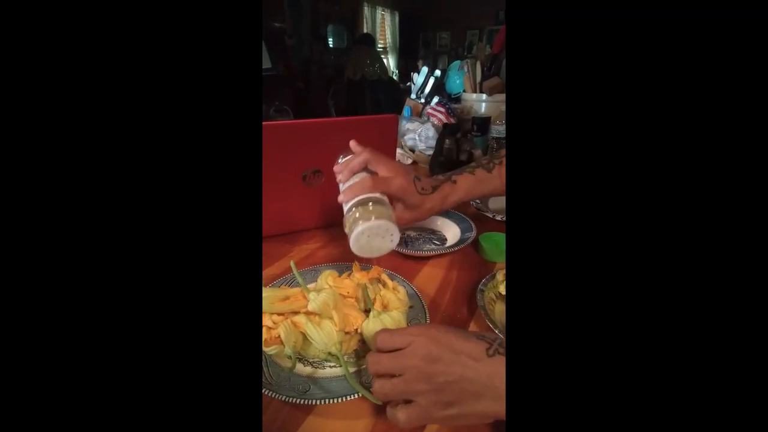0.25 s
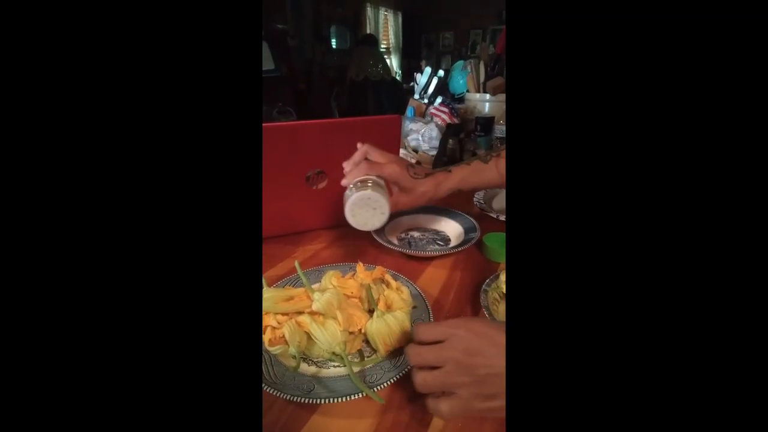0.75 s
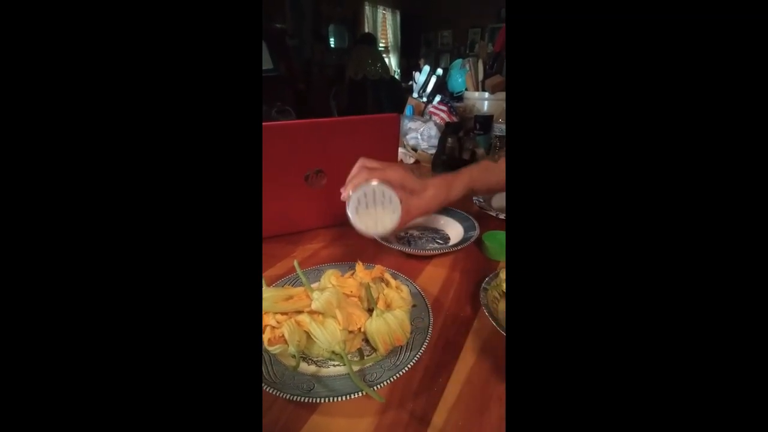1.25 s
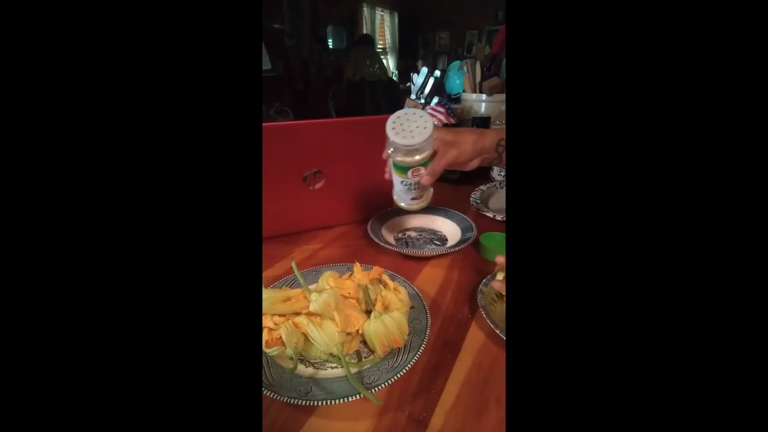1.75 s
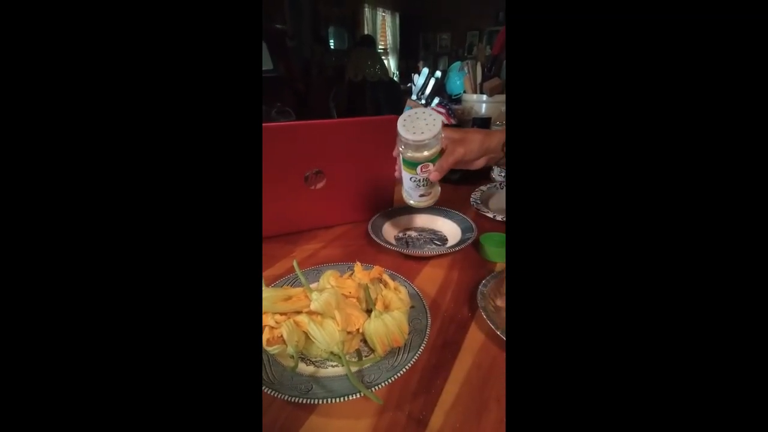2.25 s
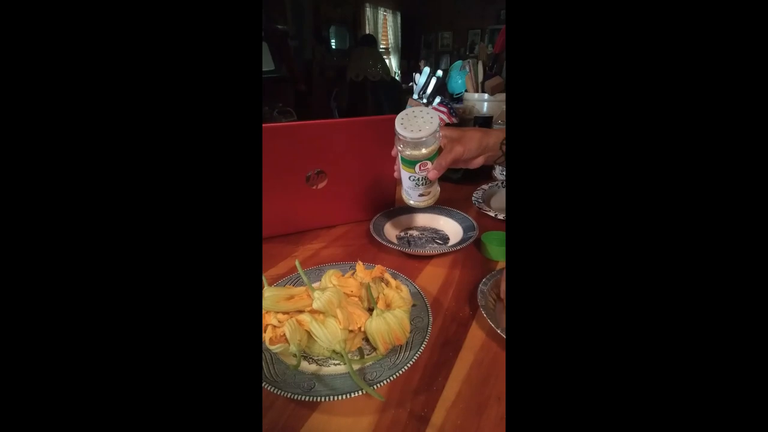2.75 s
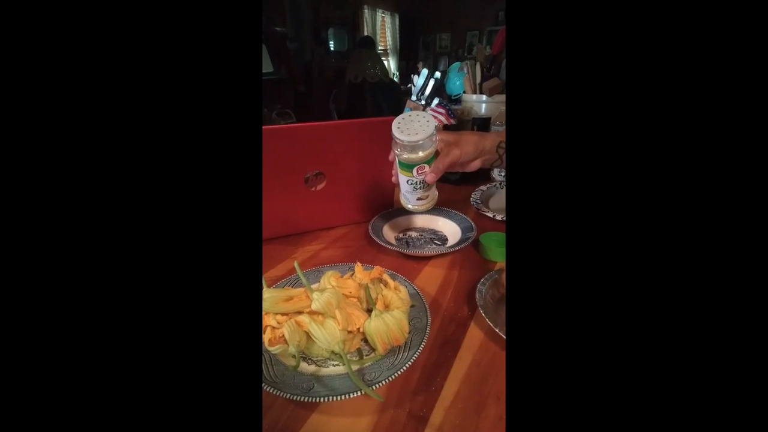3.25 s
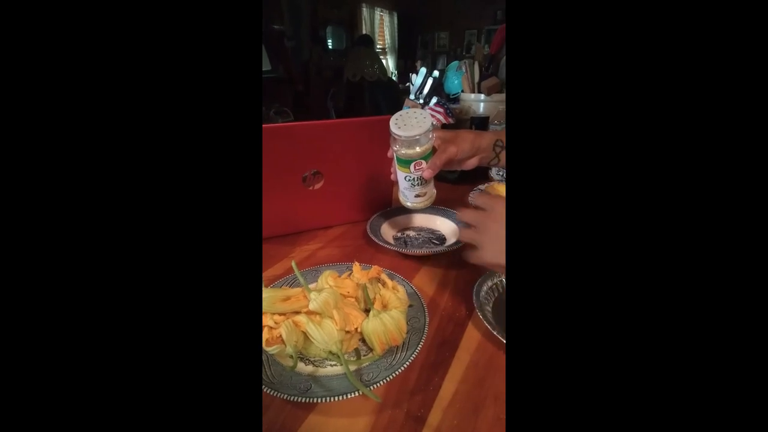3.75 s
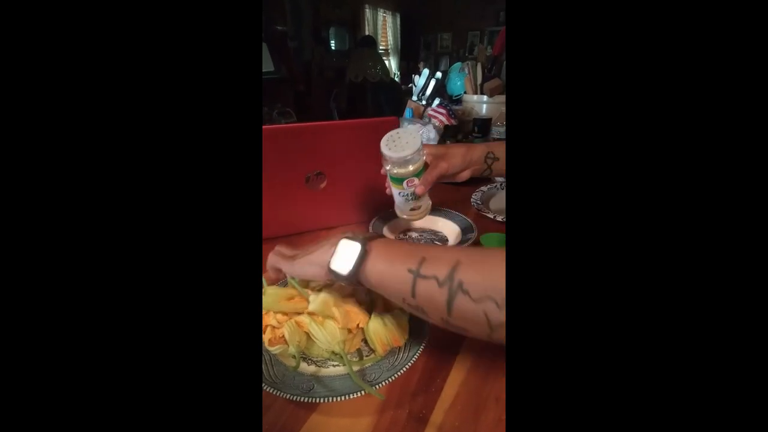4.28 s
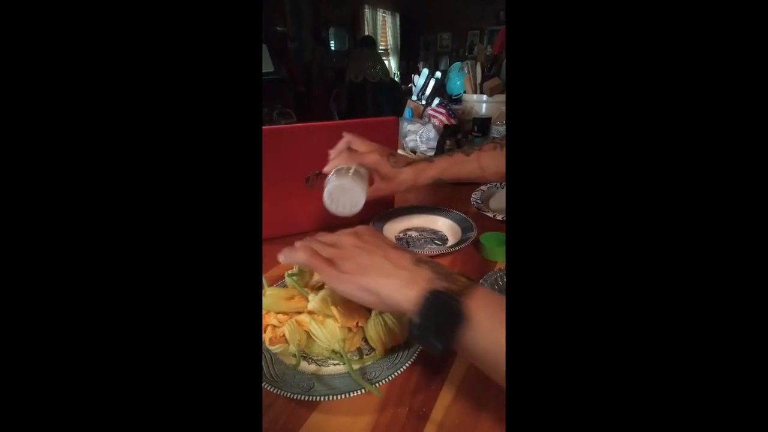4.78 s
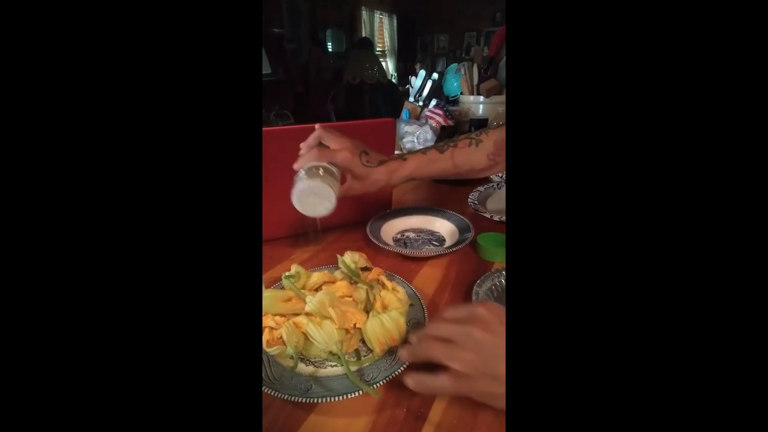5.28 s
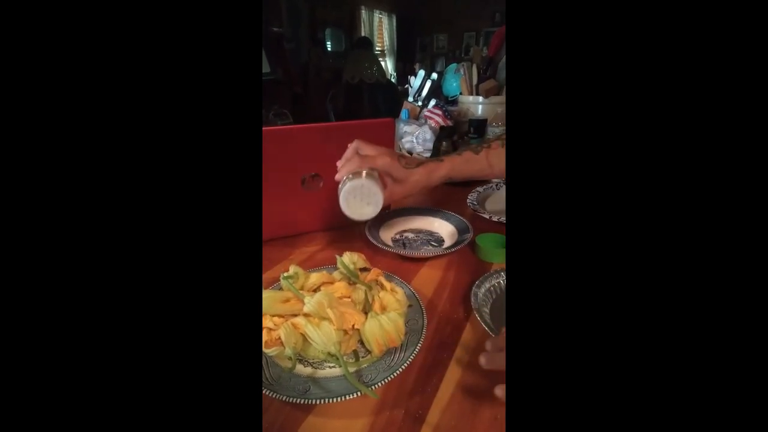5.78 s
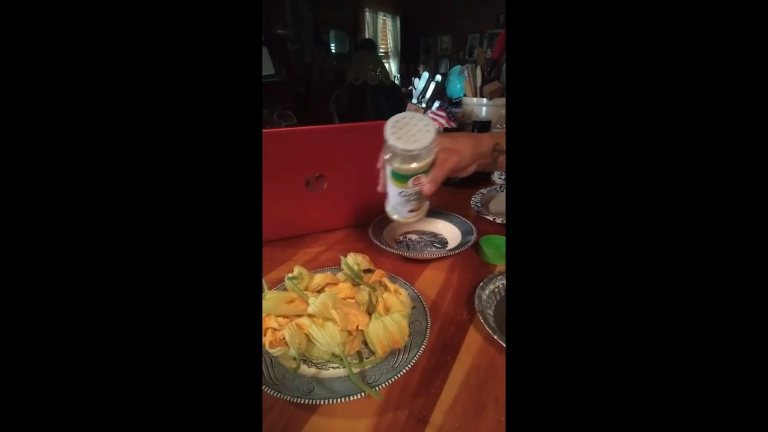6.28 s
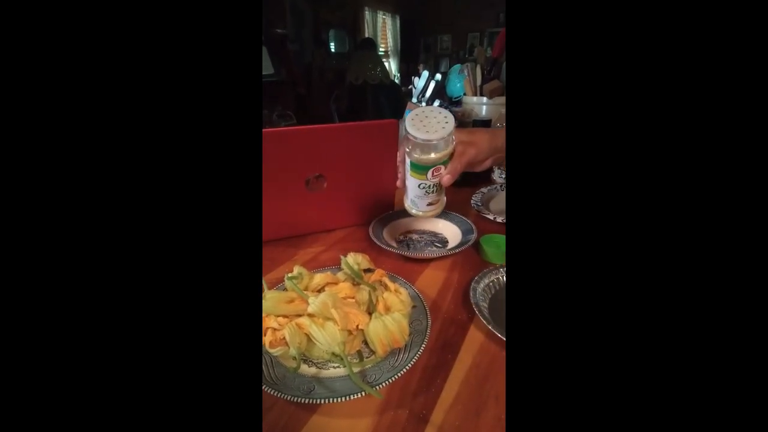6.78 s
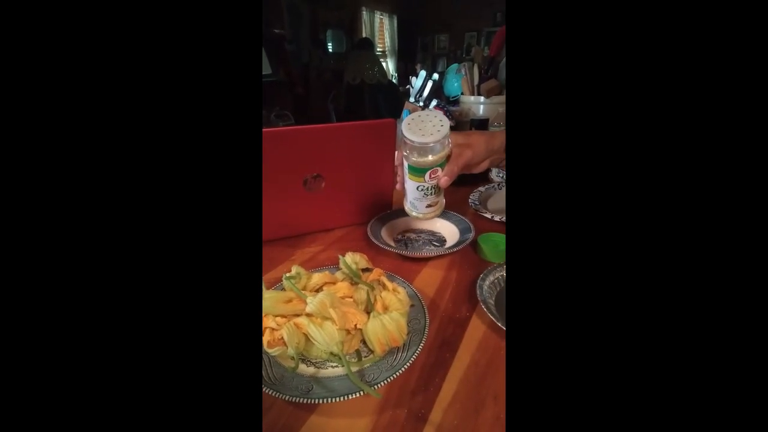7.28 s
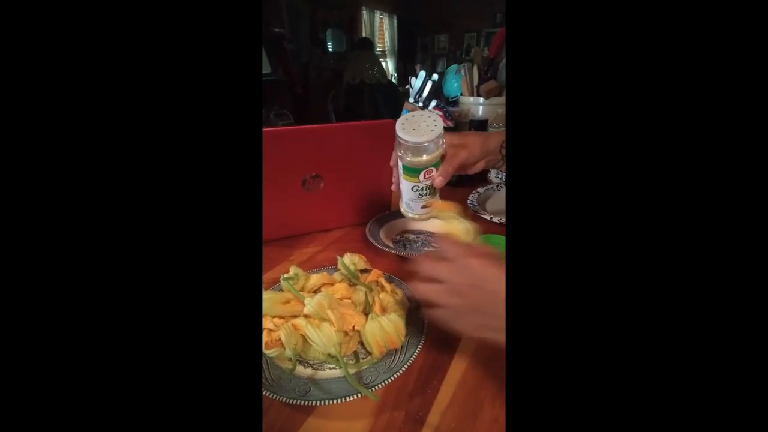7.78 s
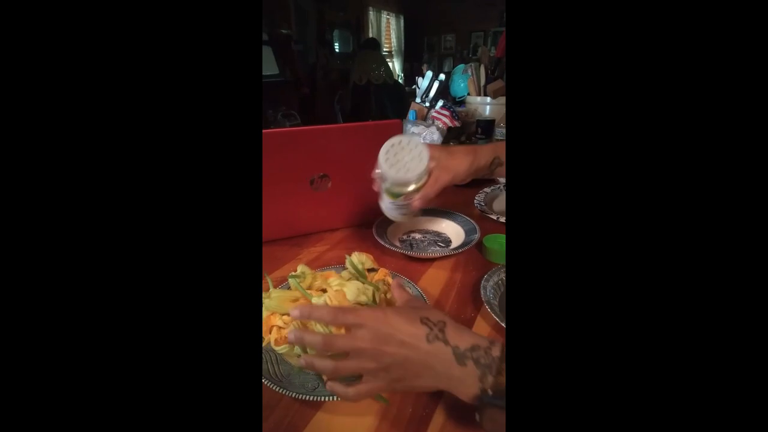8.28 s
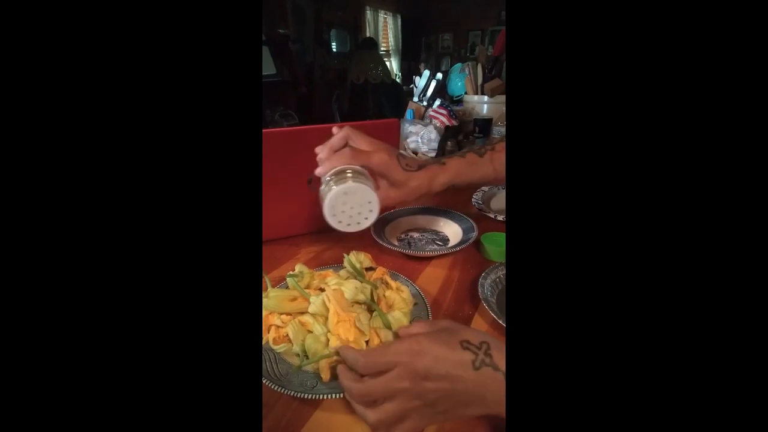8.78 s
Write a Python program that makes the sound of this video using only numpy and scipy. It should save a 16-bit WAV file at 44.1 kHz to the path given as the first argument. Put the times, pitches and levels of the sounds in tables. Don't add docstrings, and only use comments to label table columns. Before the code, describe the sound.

Over a low kitchen hum, seasoning rustles faintly in a jar, a dish clacks down on a wooden table, then crockery clinks and scrapes in a stack.

```python
import sys
import numpy as np
from scipy import signal
from scipy.fft import rfft, irfft, next_fast_len
from scipy.io import wavfile
from scipy.ndimage import uniform_filter1d

SR = 44100
rng = np.random.default_rng(int(sys.argv[2]) if len(sys.argv) > 2 else 0)


def voltage_ratio(level):
    return 10 ** (np.asarray(level, float) / 20)


def persist_wave(psi):
    counts = np.round(np.clip(psi, -1, 1) * 32767).astype(np.int16)
    wavfile.write(sys.argv[1], SR, np.atleast_2d(counts).T)


N = 398663
GATE_EDGE_S = 0.01


def rms_one(x):
    return x / np.sqrt(np.mean(x ** 2) + 1e-20)


def at_hz(points, hz):
    table_hz, values = np.array(points).T
    return np.interp(np.log(hz), np.log(table_hz), values)


def drift(rate_hz):
    r = np.exp(-80 * np.pi * rate_hz / SR)
    warm_up = 2000
    noise = rng.standard_normal(N // 40 + warm_up + 2)
    slow = signal.lfilter([1], [1, -2 * r, r * r], noise)[warm_up:]
    return np.interp(np.arange(N) / 40, np.arange(len(slow)), rms_one(slow))


def ring(clicks, hz, t60):
    r = voltage_ratio(-60 / (t60 * SR))
    w = 2 * np.pi * hz / SR
    return signal.lfilter([0, np.sin(w)], [1, -2 * r * np.cos(w), r * r], clicks + 1e-18)


def resonate(x, hz, width_hz):
    r = np.exp(-np.pi * width_hz / SR)
    w = 2 * np.pi * hz / SR
    return signal.lfilter([(1 - r * r) / 2, 0, (r * r - 1) / 2], [1, -2 * r * np.cos(w), r * r], x)


def pan(left_db):
    return voltage_ratio(np.multiply.outer([0.5, -0.5], left_db))


def crockery():
    # (frequency [Hz], level [dB], t60 [s])
    thud_modes = [(75, -11, .07), (140, -11, .05), (230, -6, .03), (330, -7, .025), (431, -4, .045),
                  (500, -4, .03), (570, 0, .035), (650, -3, .03)]
    knock_modes = [(770, -12.5, 0.058), (831.2, -12, .06), (974.3, -9, 0.061), (1131, -3.5, 0.09),
                   (1259.4, -3.5, 0.04), (1370, -2.5, 0.035), (1601, -5, 0.026)]
    bowl_modes = [(1900, -8, .02), (2250, -5, .02), (2450, -5, .025), (2640, 0, .035), (2750, -3, .03),
                  (2920, -5, .025), (3117, -3, .03), (3295, -4, .02)]
    rim_modes = [(3700, -10, .008), (4000, -4, .009), (4500, 0, .008), (4870, -2, .007), (5470, -2, .007),
                 (5900, -2, .006), (6500, -2, .005), (7100, -2, .006), (7800, -8, .004), (8800, -13, .003),
                 (10500, -19, .002)]
    # (frequency [Hz], left-right [dB])
    toward_left = [(400, 2), (1000, 4.5), (2500, 3), (5000, 12), (8000, 6), (12000, 10)]
    # (time [s], peak level [dB], hardness [1
    # knock, 2 bowl, 3 rim], table thud [dB re peak])
    contacts = [(.193, -70, 2.1, 0), (.445, -59, 1.9, -20), (.623, -62, 1.4, -19), (0.64, -70, 1.6, -15),
                (.713, -68, 0.88, -15), (1.268, -54, 5.1, -4), (1.861, -47, 1.26, 1.5),
                (1.916, -42, 3.1, -16.5), (1.972, -52.5, 2.04, -15), (2.232, -58, 0.48, 5),
                (2.369, -52.5, 1.26, -0.5), (2.762, -59, 0.77, 4.5), (2.849, -35.5, 2.2, -11.5),
                (2.852, -22, 2.4, -13), (2.858, -24, 2.1, -20), (2.863, -28.5, 1.34, -14),
                (3.25, -33, 1.26, -1.5), (3.3, -45.5, 2.23, -18), (3.464, -72, 1.55, 5.5),
                (6.36, -48.5, 2.5, -6), (6.395, -35.5, 8, -38), (6.415, -34, 2.15, -5),
               (6.427, -23.5, 4, -22), (6.461, -51, 1.6, -18), (6.496, -61, 1.5, -8), (6.51, -44, 0.4, -22),
               (6.563, -35.5, 2.1, -10.5), (6.568, -38, 5, -11), (6.572, -35.5, 3, -24),
               (6.61, -40.5, 3, -21), (6.734, -52.5, 1.9, -4.5), (7.128, -48, 2.5, -10),
               (7.259, -46, 3.2, -23), (7.287, -47.5, 2.5, 3.5), (7.328, -46, 4.5, -20),
               (8.185, -45.5, -0.6, 2)]
    misfit_loss_db = 4.5
    tilt_db_per_octave = 4.5
    chatter_s = 0.002
    hit_top_hz = 12000
    right_delay = 5

    times_s, peak_db, hardness, thud_db = np.transpose(contacts)
    misfit_db = misfit_loss_db * np.subtract.outer([1, 2, 3], hardness) ** 2
    knock_db, bowl_db, rim_db = misfit_db.min(axis=0) - misfit_db
    bodies = [(1, thud_modes, thud_db), (1, knock_modes, knock_db), (2, bowl_modes, bowl_db), (3, rim_modes, rim_db)]

    after = np.arange(400)
    chatter_shape = (1 - np.exp(-after / 12)) * np.exp(-after / (chatter_s * SR)) / np.sqrt(chatter_s * SR)
    sounds = np.zeros((2, len(times_s), 3800))
    for step, modes, body_db in bodies:
        body = 0
        middle_hz = modes[len(modes) // 2][0]
        for hz, mode_db, t60 in modes:
            alike = np.clip(700 / hz, 0, 1)
            both, left, right = rng.standard_normal((len(times_s), 3, len(after))).transpose(1, 0, 2)
            push = (alike * both + (1 - alike) * np.array([left, right])) * chatter_shape
            drive = np.abs(push @ np.exp(2j * np.pi * hz * after / SR))[..., None]
            force = np.zeros(sounds.shape)
            force[..., after] = push / (drive + 0.1) ** 0.96
            tilt_db = tilt_db_per_octave * np.clip(hardness - step, -1, 1) * np.log2(hz / middle_hz)
            hit_gain = voltage_ratio(peak_db + body_db + mode_db + tilt_db + 3.0)[:, None]
            body = body + ring(force, hz, t60) * hit_gain * pan(at_hz(toward_left, hz))[:, None, None]
        no_bass = signal.butter(2, 0.7 * modes[0][0], "high", fs=SR, output="sos")
        sounds += signal.sosfilt(no_bass, body)

    out = np.zeros((2, N))
    starts = ((times_s + 0.00061) * SR).astype(int)
    for k, start in enumerate(starts):
        out[:, start:start + sounds.shape[2]] += sounds[:, k]
    out[1] = np.roll(out[1], right_delay)
    return signal.sosfilt(signal.butter(2, hit_top_hz, fs=SR, output="sos"), out)


def strokes():
    # (time [s], length [s], starting level [dB], swell by the end [dB])
    shakes = [
        (.461, 0.043, -81, 3),
        (.497, 0.057, -60, -8.5),
        (1.268, 0.027, -70.5, -7.5),
        (1.457, .235, -65.5, 0.5),
        (5.142, .058, -63.5, -9),
        (5.778, 0.03, -76.5, 2.5),
        (6.188, .21, -66.5, 3),
    ]
    # (time [s], length [s], starting level [dB], swell by the end [dB])
    scrapes = [(1.855, 0.056, -62.5, 3.5), (1.9, 0.12, -59, -4.5), (2.032, 0.079, -61.5, -6),
               (2.146, 0.053, -76.5, 15), (2.23, .05, -82, 25.5), (2.275, 0.12, -57, -8.5),
               (2.408, .079, -78.5, 19), (2.708, 0.042, -78, 10.5), (3.235, .139, -57.5, -8),
               (5.236, 0.04, -77, 17), (5.293, 0.037, -74.5, .1), (5.368, 0.073, -71, 3.5),
               (6.393, 0.083, -51, 5), (6.515, 0.041, -52.5, -4), (6.6, 0.084, -53.5, -19),
               (6.68, 0.039, -55.5, -8), (6.81, 0.13, -69, 9.5), (6.93, .06, -69.5, 2),
               (6.97, 0.076, -62, -0.5), (7.095, 0.072, -62, 1.5), (7.165, 0.085, -71.5, 12.5),
               (7.215, 0.13, -58, 3), (7.305, 0.12, -59.5, -5.5), (7.478, .038, -71.5, 4.5),
               (8.042, .056, -73, 11.5)]
    # (time [s], length [s], starting level [dB], swell by the end [dB])
    rocking = [
        (.592, 0.067, -69.5, 4),
        (.69, .032, -78, 9),
        (2.758, 0.066, -66, 4.5),
        (2.839, 0.11, -64.5, 13),
        (2.88, .198, -52.5, -16.5),
        (6.478, 0.04, -62.5, 7.5),
        (6.56, 0.035, -49, -8),
        (6.72, .042, -55.5, -12.5),
    ]
    # (time [s], length [s], level [dB], brightness [dB])
    patters = [(0.18, 0.019, -78, -4), (1.077, 0.0076, -77, -8), (1.097, 0.012, -69, -1),
               (1.124, .006, -87, .1), (1.218, .019, -75, 5), (1.378, 0.0087, -75.5, 7),
               (1.399, 0.012, -73, 5), (1.796, .025, -83.5, 13), (1.843, 0.0082, -70, 5),
               (2.628, .011, -76.5, -6), (2.663, 0.0091, -76, -21), (3.197, 0.031, -75.5, -2),
               (3.464, 0.011, -77, -2), (4.253, 0.021, -76, -2), (4.286, 0.023, -75.5, -5.5),
               (4.324, 0.012, -77, -4.5), (5.086, 0.011, -78, 5.5), (5.466, 0.03, -82, .1),
               (5.532, .006, -71, -4.5), (5.6, 0.016, -77.5, -4), (5.621, 0.021, -72, -13),
               (5.679, 0.0085, -74.5, -4), (5.728, .007, -73, -15), (5.82, .013, -76, -6),
               (5.998, 0.0065, -73, -1), (6.133, 0.016, -78, 0), (7.442, .006, -79, -5.5),
               (7.458, 0.011, -76, -11), (8.018, 0.0088, -77, -2)]
    shake_tone = (-6.5, 4.3, 0.28)
    scrape_tone = (-7, -9, 0.12)
    rocking_tone = (2.7, -12.5, 0.05)
    patter_dull_db, patter_bright_db, patter_attack = -1.1, -5, 0.05
    dull_loss = 0.51

    rows = []
    for table, tone in (shakes, shake_tone), (scrapes, scrape_tone), (rocking, rocking_tone):
        rows += [(*row, *tone) for row in table]
    for start_s, length_s, db, brightness_db in patters:
        dull_db = patter_dull_db - dull_loss * brightness_db
        bright_db = patter_bright_db + brightness_db
        rows.append((start_s, length_s, db, 0, dull_db, bright_db, patter_attack))
    return rows


def stroke_levels():
    # (dull [dB], body [dB], bright [dB])
    between_db = [-78, -83, -85.5]
    attack_db = -18.5
    release_db, release_share = -5.5, 0.21
    edge = int(GATE_EDGE_S * SR)

    levels = np.outer(between_db, np.ones(N))
    for start_s, length_s, db, swell_db, dull_db, bright_db, attack_share in strokes():
        a = int(start_s * SR) - edge
        b = int((start_s + length_s) * SR) + edge
        done = np.linspace(0, 1, b - a)
        shape_db = db + swell_db * done
        shape_db += attack_db * np.maximum(1 - done / attack_share, 0)
        shape_db += release_db * np.maximum(1 - (1 - done) / release_share, 0)
        parts_db = np.add.outer([dull_db, 0, bright_db], shape_db)
        levels[:, a:b] = np.maximum(levels[:, a:b], parts_db)
    return uniform_filter1d(levels, edge, axis=1)


def rustle():
    # (frequency [Hz], width [Hz], level [dB])
    dull_colour = [(985, 1300, 3), (1432, 670, 0)]
    body_colour = [(2223, 1100, -1.9), (2597, 610, 0.9), (3390, 1400, -2), (5010, 2400, -1.6)]
    bright_colour = [(6290, 5400, 1.5), (8060, 2000, 6), (11500, 8400, -10.5), (14300, 3000, -19)]
    grains_per_s, grain_spread_db = 4700, 2.5

    dull_db, body_db, bright_db = stroke_levels()
    sizes = voltage_ratio(grain_spread_db * np.minimum(rng.exponential(1, (2, N)), 5)) * rng.choice([-1, 1], (2, N))
    present = rng.random((2, N)) < grains_per_s / SR
    grains = sizes * present * voltage_ratio(2.6 * drift(41))

    out = 0
    parts = [(dull_colour, dull_db, 1.0), (body_colour, body_db, 4), (bright_colour, bright_db, -1.5)]
    for colour, level_db, left_db in parts:
        tone = 0
        for hz, width_hz, db in colour:
            own_grains = np.roll(grains, int(hz), axis=1)
            coloured = resonate(resonate(own_grains, hz, width_hz), hz, 2 * width_hz)
            tone = tone + voltage_ratio(db + 1.8 * drift(18)) * coloured
        out = out + rms_one(tone) * voltage_ratio(level_db + 1.5) * pan(left_db)[:, None]
    return out


def kitchen(x):
    # (frequency [Hz], t60 [s])
    room_t60 = [(200, 0.092), (530, 0.4), (1390, 0.4), (3680, 0.47), (9700, 0.18)]
    room_left_db = 4

    t = np.arange(SR // 2) / SR
    tail = 0
    for low_hz in 150 * 2 ** np.arange(7.):
        band = signal.butter(2, [low_hz, 2 * low_hz], "band", fs=SR, output="sos")
        dying = voltage_ratio(-60 * t / at_hz(room_t60, 1.4 * low_hz))
        tail = tail + signal.sosfilt(band, rng.standard_normal((2, len(t)))) * dying
    tail *= 1 - np.exp(-t / 0.0033)
    tail *= pan(room_left_db)[:, None] / np.sqrt(np.sum(tail ** 2) / 2)
    return signal.fftconvolve(x.mean(axis=0)[None], tail, axes=1)[:, :N]


def gate(x):
    shut_db, crossover_hz = -16.5, 500
    opened = np.zeros(N)
    for start_s, length_s, *_ in strokes():
        opened[int(start_s * SR):int((start_s + length_s) * SR)] = 1
    opened = uniform_filter1d(opened, max(int(GATE_EDGE_S * SR), 1))
    low = signal.sosfilt(signal.butter(3, crossover_hz, fs=SR, output="sos"), x)
    return low + (x - low) * voltage_ratio(shut_db * (1 - opened))


def hum():
    # (frequency [Hz], level [dB per Hz])
    air_colour = [(8.8, -28), (15, 3), (75, -13.5), (112, -7), (150, -12.5), (262, -11), (330, -14.5),
                  (361, -13.5), (394, -18), (705, -27.5), (1000, -36.5), (1510, -48), (2080, -49.5),
                  (5130, -54.5), (16000, -64.5)]
    # (frequency [Hz], width [Hz], level [dB])
    motor_tones = [(102, 14, -74), (184.1, 14, -70.5), (366, 5, -71.5), (1467, 180, -89.5)]
    # (frequency [Hz], likeness [1 = same])
    likeness = [(60, -0.67), (130, 0.99), (290, 0.89), (640, -0.76), (1410, 0.56), (3100, -1.7),
                (6820, -0.55), (15000, -0.02)]
    # (frequency [Hz], left-right [dB])
    sideways = [(60, 0), (110, 0.5), (200, 0.5), (380, 5.5), (700, -3.5), (1290, 1.5), (2380, 4),
                (4400, 0.5), (8120, -1), (15000, -1)]
    # (time [s], level [dB re steady])
    leak = [(0, 0.5), (1.002, 1), (1.8, 1.5), (2.599, 0), (3.499, -1), (4.5, -1.5), (5.2, 3), (6.1, 0.5),
            (7.5, -0.5), (8.2, -2.5), (9.04, 0.5)]
    air_db = -54.5

    size = next_fast_len(N)
    hz = np.maximum(np.fft.rfftfreq(size, 1 / SR), 1)
    mid, side = rfft(rng.standard_normal((2, size)))
    alike = np.clip(at_hz(likeness, hz), 0, 1)
    pair = np.sqrt(1 + alike) * mid + np.sqrt(1 - alike) * side * [[1], [-1]]
    pair = pair * pan(at_hz(sideways, hz))
    air = voltage_ratio(air_db) * rms_one(irfft(pair * voltage_ratio(at_hz(air_colour, hz)))[:, :N])
    hiss = signal.sosfilt(signal.butter(2, 1300, "high", fs=SR, output="sos"), air)
    leak_db = np.interp(np.arange(N) / SR, *np.transpose(leak)) + 1.2 * drift(12)
    out = air * voltage_ratio(0.7 * drift(3.7)) + hiss * (voltage_ratio(leak_db) - 1)

    white = irfft(pair)[:, :N]
    for tone_hz, width_hz, db in motor_tones:
        tone = rms_one(resonate(resonate(white, tone_hz, width_hz), tone_hz, width_hz))
        out += voltage_ratio(db + 0.51 * drift(4.7) + leak_db * (tone_hz > 1000)) * tone
    return out


def fan():
    # (first time [s], frequency [Hz], level [dB], t60 [s])
    ticks = [
        (.185, 5141, -91, .3),
        (.065, 5766, -95, .25),
        (.265, 5766, -95, .25),
        (.1, 4460, -99, .9),
    ]
    turn_s = 0.35
    out = np.zeros(N)
    for first_s, hz, db, t60 in ticks:
        at = (np.arange(first_s, N / SR, turn_s) * SR).astype(int)
        clicks = np.zeros(N)
        clicks[at] = voltage_ratio(db + rng.normal(0, 1.5, len(at)))
        out += ring(clicks, hz, t60)
    return out


def scene():
    room_db = -9
    hits = crockery()
    table_sounds = hits + voltage_ratio(room_db) * kitchen(hits) + rustle()
    return gate(table_sounds) + hum() + fan()


def band_limit(x):
    return signal.sosfilt(signal.butter(12, 16460, fs=SR, output="sos"), x)


def record(dry):
    low_pass = signal.cheby2(14, 50, 16300, fs=SR, output="sos")
    mix = signal.sosfilt(low_pass, dry)
    return band_limit(mix)


dry = scene()
out = record(dry)
persist_wave(out)
```